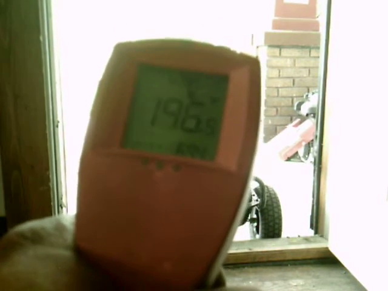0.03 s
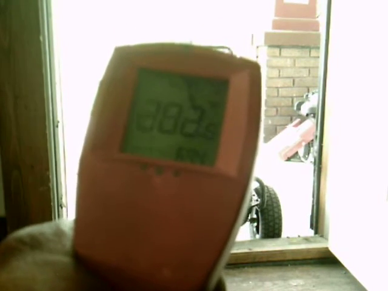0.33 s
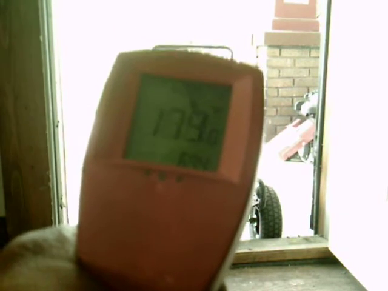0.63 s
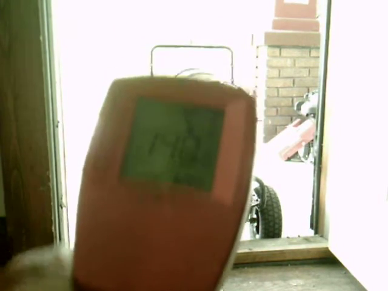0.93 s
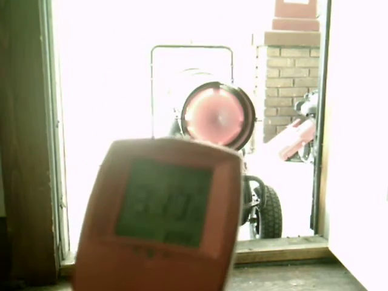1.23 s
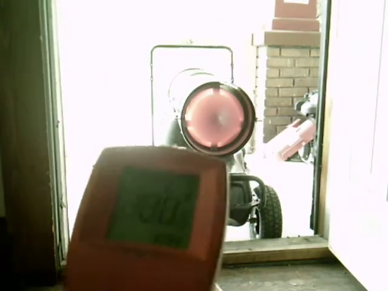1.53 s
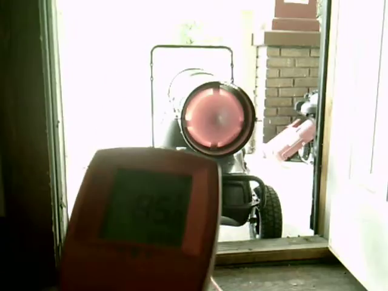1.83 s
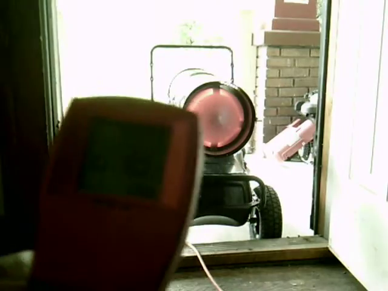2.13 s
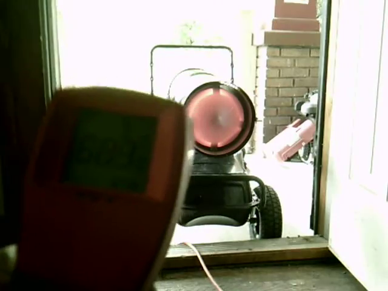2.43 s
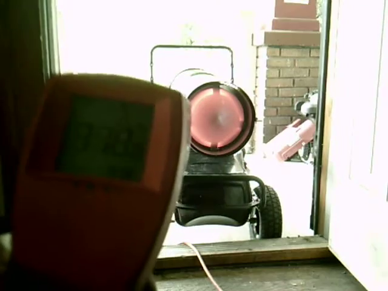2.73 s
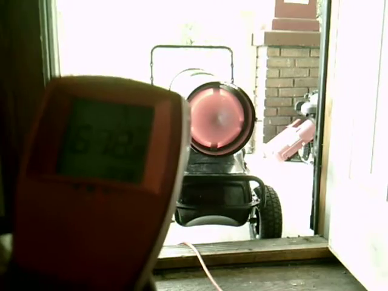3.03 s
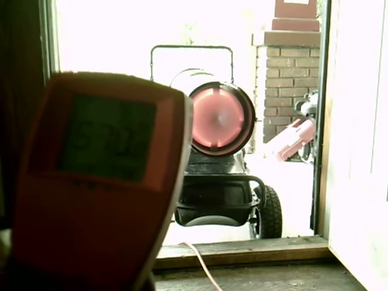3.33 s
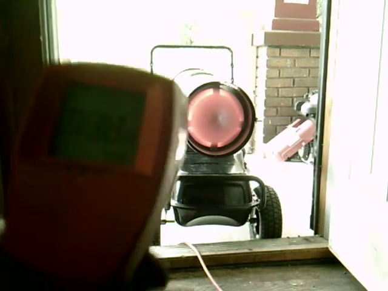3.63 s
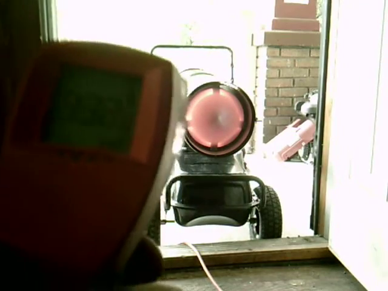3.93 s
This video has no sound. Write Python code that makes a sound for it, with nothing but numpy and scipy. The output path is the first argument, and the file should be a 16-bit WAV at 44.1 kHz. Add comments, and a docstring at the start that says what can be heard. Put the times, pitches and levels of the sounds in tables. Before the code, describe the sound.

The steady roar of a forced-air heater comes through a doorway, its fan humming and whistling faintly. Throughout, a hand close by makes scattered sharp clicks and a few dull thuds on a plastic thermometer.

```python
"""A steady low roar: a torpedo heater burns just outside an open door, its flame sputtering
and resonating in tube and doorway. The motor hums, the fan sings at multiples of its shaft
rate and the air stream whistles faintly. Close by, a hand clicks the plastic trigger of a
thermometer, ringing its case, and bumps the case with dull thuds."""
import sys
import numpy as np
from scipy import signal
from scipy.fft import rfft, irfft
from scipy.io import wavfile
from scipy.ndimage import uniform_filter1d

SR = 44100
rng = np.random.default_rng(int(sys.argv[2]) if len(sys.argv) > 2 else 0)


def wav_out(sig):
    """Save sig, one row per channel (or a flat mono array), as 16-bit PCM at SR to the path in sys.argv[1]."""
    wavfile.write(sys.argv[1], SR, np.round(np.clip(np.atleast_2d(sig).T, -1, 1) * 32767).astype(np.int16))


N = 176400


def undb(db):
    """Decibels to gain."""
    return 10 ** (np.asarray(db) / 20)


def walk(rate_hz):
    """Smooth random motion, rms 1."""
    hold = max(int(SR / rate_hz), 2)
    steps = np.resize(np.repeat(rng.standard_normal(400), hold), N)
    return unit_rms(uniform_filter1d(uniform_filter1d(steps, hold), hold))


def unit_rms(x):
    return x / np.sqrt(np.mean(x ** 2))


def resonance(f, centre_hz, width_hz):
    """Power response of one resonance, peak 1."""
    return 1 / (1 + (2 * (f - centre_hz) / width_hz) ** 2)


def sine(cycles):
    """Sine with a random start phase."""
    return np.sin(2 * np.pi * (cycles + rng.random()))


def ring(modes, attack_s):
    """Damped modes, swelling while the contact lasts."""
    t = np.arange(N // 20) / SR
    swell = np.sin(np.pi / 2 * np.minimum(t / attack_s, 1)) ** 2
    return swell * sum(undb(db - 60 * t / t60_s) * sine(hz * t) for hz, db, t60_s in modes)


def mix_in(out, start_s, sound):
    i = int(np.clip(start_s * SR, 0, N - 1))
    out[i:i + len(sound)] += sound[:N - i]


# flame and fan air spectrum: f/Hz, relative density/dB
ROAR_SPECTRUM = [(12, -19.5), (45, -17), (85, -9.5), (160, -1), (300, -3.5), (385, -11), (560, -18.5),
                 (880, -17), (1150, -20.5), (1330, -23.5), (1460, -29.5), (2000, -32.5), (2620, -37.5),
                 (2830, -34.5), (3350, -35), (3700, -43.5), (5300, -44), (6000, -62.5)]
# tube and doorway resonances: f/Hz, width/Hz, gain/dB
TUBE_DOOR_PEAKS = [(156.3, 9, 6), (192.7, 14, 3.5), (239.7, 14, 5), (296.3, 14, 3.5), (392, 7, 3),
                   (435.3, 18, 4), (631.5, 31, 5), (691, 36, 5), (855, 22, 1), (876.7, 21, 9.5),
                   (940.4, 18, 11), (993.6, 18, 9), (1092, 24, 3), (1202, 18, 2.5)]
# cancellation by floor and door echoes: f/Hz, width/Hz, gain/dB
ECHO_NULLS = [(210.7, 8.1, -7.5), (254.5, 11, -9), (380.6, 12, -8), (885, 7.6, -2.5), (957, 13, -9)]
ROAR_DB, FLUTTER_DB, FLUTTER_HZ, FLICKER_DB, FLICKER_HZ = -18.5, 0.67, 14, 1.0, 21.94
PUFFS_PER_S, PUFF_HZ, PUFF_DB, PUFF_SPREAD_DB = 22, 189, -28, 3.5

def flame_roar():
    """Turbulence and small flame puffs sound through tube and doorway."""
    f = np.maximum(np.arange(N // 2 + 1) * SR / N, 1)
    space = undb(sum(db * resonance(f, hz, width) for hz, width, db in TUBE_DOOR_PEAKS + ECHO_NULLS))
    knots_hz, knots_db = np.array(ROAR_SPECTRUM).T
    density = undb(np.interp(np.log(f), np.log(knots_hz), knots_db))
    air = rfft(rng.standard_normal(N)) * density * space
    # octaves flicker alone and flutter together
    octave = np.clip(np.log2(f / 100), 0, 6)
    bands = [irfft(air * np.maximum(1 - abs(octave - k), 0), N) for k in range(7)]
    rush = sum(band * undb(FLICKER_DB * walk(FLICKER_HZ)) for band in bands)
    rush *= undb(FLUTTER_DB * walk(FLUTTER_HZ))
    onsets = rng.random(N) < PUFFS_PER_S / SR
    kicks = onsets * undb(PUFF_SPREAD_DB * rng.standard_normal(N))
    puff_spectrum = (f / PUFF_HZ) ** 2 * np.exp(-2 * f / PUFF_HZ)
    puffs = -irfft(rfft(kicks) * puff_spectrum * space, N)
    return undb(ROAR_DB) * unit_rms(rush) + undb(PUFF_DB) * unit_rms(puffs)


# mains hum: f/Hz, rms level/dB
HUM_TONES = [(59.9, -35.5), (119.8, -37.5)]
# fan tones: shaft order, rms level/dB
FAN_TONES = [(12, -50.5), (20, -43), (22, -41.5), (24, -49), (28, -41.5), (32, -53.5), (36, -68.5)]
SHAFT_HZ, SHAFT_WANDER = 55.34, 0.00034
HUM_WAVER_DB, FAN_WAVER_DB = 2.5, 1.96

def motor_and_fan(t):
    """Mains hum and shaft harmonics, wavering in the hot air."""
    turns = np.cumsum(SHAFT_HZ * (1 + SHAFT_WANDER * walk(2.85))) / SR
    hum = sum(undb(db + HUM_WAVER_DB * walk(4)) * sine(hz * t) for hz, db in HUM_TONES)
    fan = sum(undb(db + FAN_WAVER_DB * walk(9)) * sine(order * turns) for order, db in FAN_TONES)
    return np.sqrt(2) * (hum + fan)


# air stream resonances: f/Hz, width/Hz, relative level/dB
WHISTLE_PEAKS = [(2096, 15, -6), (2167, 22, 1.5), (2201, 18, 0), (2256, 28, -9)]
# locks onto one pitch: centre t/s, length/s, f/Hz, rms level at centre/dB
WHISTLE_LOCKS = [(.11, .12, 2190, -42.5), (1.105, 0.17, 2200, -42), (1.25, 0.23, 2160, -41),
                 (1.883, .12, 2193, -35.5), (2.53, .11, 2214, -40.5), (3.127, .1, 2176, -42),
                 (3.314, 0.18, 2160, -43), (3.674, 0.1, 2210, -39)]
WHISTLE_DB, WHISTLE_WAVER_DB, PITCH_JITTER = -45, 1.5, 0.008

def air_whistle(t):
    """Air excites a cluster of narrow resonances and now and then locks onto one pitch."""
    f = np.arange(N // 2 + 1) * SR / N
    shape = sum(undb(db) * resonance(f, hz, width) for hz, width, db in WHISTLE_PEAKS)
    narrow_noise = unit_rms(irfft(rfft(rng.standard_normal(N)) * shape, N))
    out = narrow_noise * undb(WHISTLE_DB + WHISTLE_WAVER_DB * walk(10))
    unsteady_t = t + np.cumsum(PITCH_JITTER * walk(60)) / SR
    for centre_s, length_s, hz, db in WHISTLE_LOCKS:
        swell = np.cos(np.pi * np.clip((t - centre_s) / length_s, -0.5, 0.5))
        out += np.sqrt(2) * undb(db) * swell * np.sin(2 * np.pi * hz * unsteady_t)
    return out


# trigger snaps: t/s, relative level/dB, shell ring gain/dB, case knock gain/dB
TRIGGER_SNAPS = [(0.2896, -14.5, -1, 7), (0.4626, -36.5, 7, 2), (.5267, -24.5, 13.5, -2),
                 (.7008, -40, 19, -6), (1.0029, -18, 1.5, 12), (1.5664, -17, -1.5, 4),
                 (1.6127, -35, 12, -9), (1.8, -37, -7, -13), (2.153, -8.5, -0.5, 4.5),
                 (2.1789, -37, -11, -18), (2.2953, -33, 0, -14), (2.368, -37, -4, -17),
                 (2.832, -26.5, -11, -17), (3.5658, -16, -15, -6), (3.6671, -34.5, -9, -15)]
# plastic case modes: f/Hz, relative level/dB, t60/s
CASE_MODES = [(755, -5, 0.017), (1050, -9.5, .009), (1530, -14, 0.0084), (2250, -9.5, 0.013),
              (2880, -10, 0.018), (3320, -16, 0.025), (3650, -11.5, 0.014), (4513, 0, .011),
              (4825, -6, 0.0096), (5125, -10, 0.0093)]
KNOCK_BELOW_HZ, SHELL_HZ, SHELL_WIDTH_HZ = 1800, 2880, 500
CLICK_ATTACK_S, CLICK_DB, CRACK_DB, CRACK_T60_S = 0.00083, 6, -6, 0.0071

def trigger_clicks():
    """The trigger snaps with a short crack and rings the plastic case."""
    out = np.zeros(N)
    t = np.arange(N // 20) / SR
    crack_envelope = np.minimum(t / CLICK_ATTACK_S, 1) * undb(CRACK_DB - 60 * t / CRACK_T60_S)
    for start_s, snap_db, shell_db, knock_db in TRIGGER_SNAPS:
        modes = []
        for hz, db, t60_s in CASE_MODES:
            shell_weight = resonance(hz, SHELL_HZ, SHELL_WIDTH_HZ)
            gain_db = knock_db if hz < KNOCK_BELOW_HZ else shell_db * shell_weight
            modes.append((hz, db + gain_db, t60_s))
        crack = crack_envelope * rng.standard_normal(len(t))
        mix_in(out, start_s, undb(snap_db + CLICK_DB) * (ring(modes, CLICK_ATTACK_S) + crack))
    return out


# hand on the case: t/s, relative level/dB
HAND_BUMPS = [(.313, -6), (1.591, -6), (3.153, -6), (3.18, -10)]
# modes of a bump: f/Hz, relative level/dB, t60/s
THUD_MODES = [(35, -21, 0.072), (235, -1.5, 0.015), (567, -13, 0.016), (980, -8, 0.02)]

def case_bumps():
    """The hand bumps the case, exciting low modes that die fast."""
    out = np.zeros(N)
    for start_s, db in HAND_BUMPS:
        mix_in(out, start_s, undb(db) * ring(THUD_MODES, attack_s=0.00087))
    return out


def scene():
    """Heater and thermometer, mono."""
    t = np.arange(N) / SR
    heater = flame_roar() + motor_and_fan(t) + air_whistle(t)
    return (heater + trigger_clicks() + case_bumps())[None]


BAND_HZ, CLIP_LEVEL, TOP_HZ = 5850, 0.66, 6228

def record(dry):
    """A narrow-band recorder dulls the treble, overloads on the hardest click and cuts the top."""
    dull = signal.sosfilt(signal.butter(20, BAND_HZ, fs=SR, output="sos"), dry)
    clipped = dull / (1 + (dull / CLIP_LEVEL) ** 12) ** (1 / 12)
    return signal.sosfilt(signal.ellip(6, 0.3, 25, TOP_HZ, fs=SR, output="sos"), clipped)


dry = scene()
out = record(dry)
wav_out(out)
```